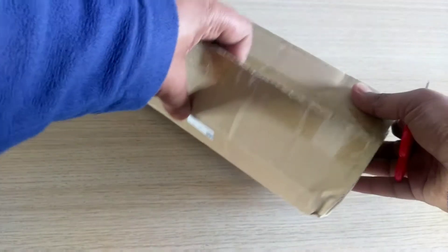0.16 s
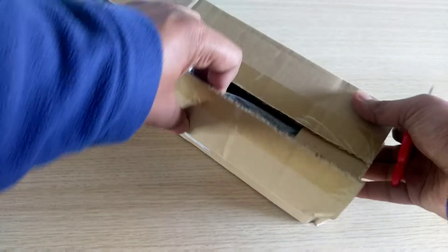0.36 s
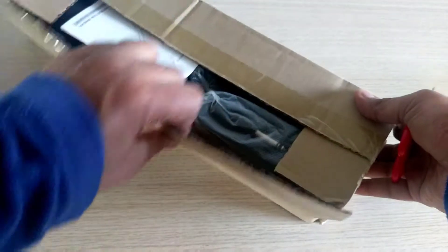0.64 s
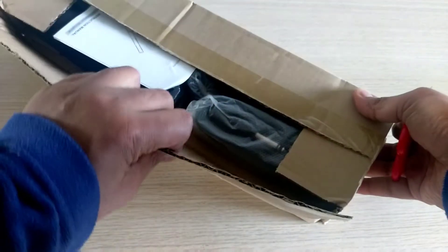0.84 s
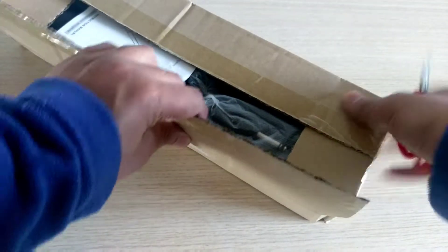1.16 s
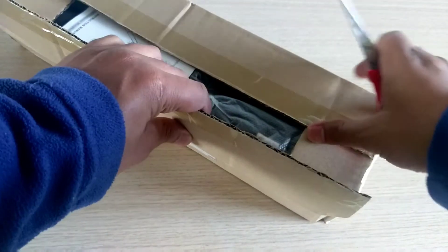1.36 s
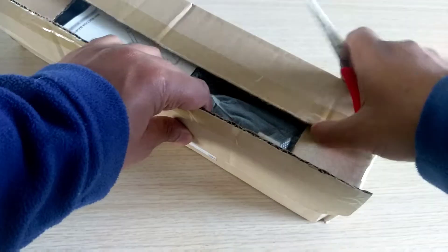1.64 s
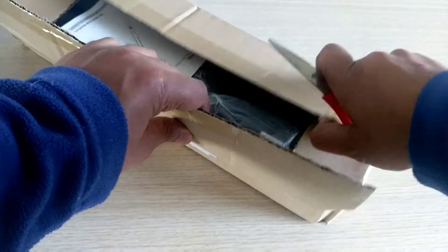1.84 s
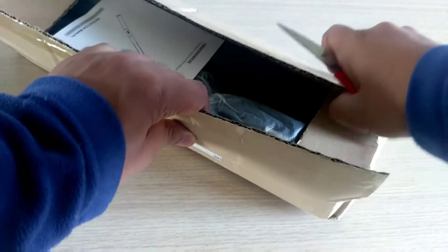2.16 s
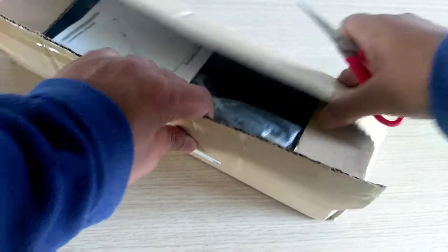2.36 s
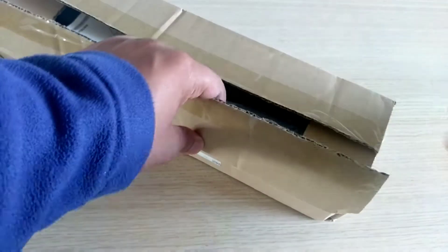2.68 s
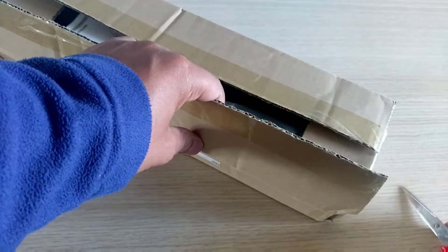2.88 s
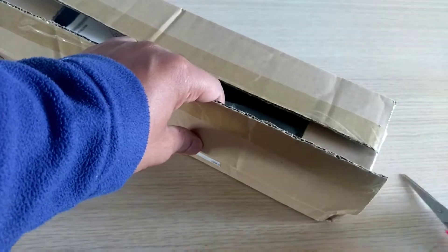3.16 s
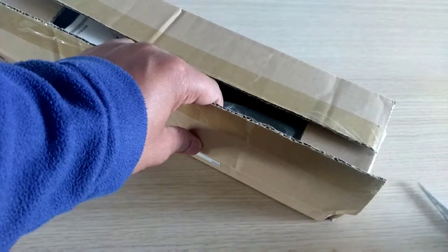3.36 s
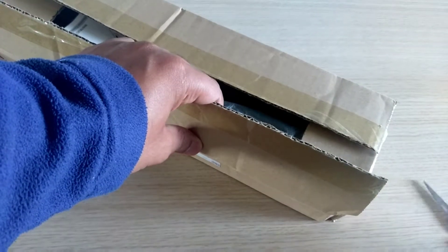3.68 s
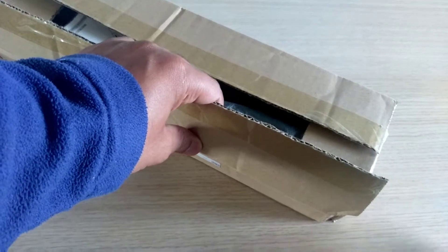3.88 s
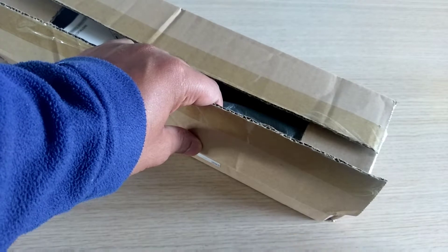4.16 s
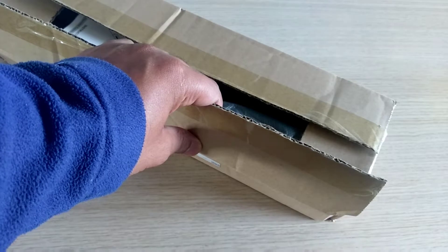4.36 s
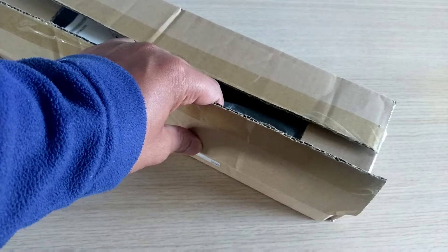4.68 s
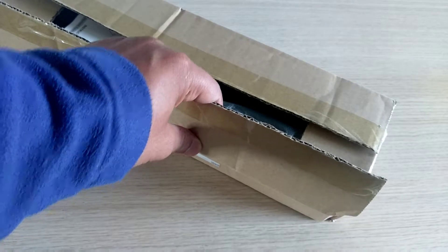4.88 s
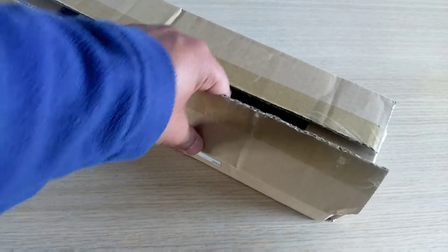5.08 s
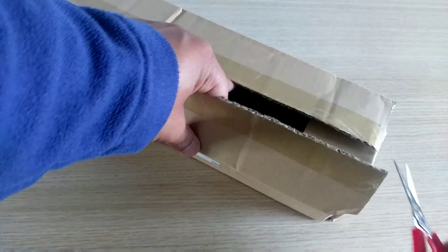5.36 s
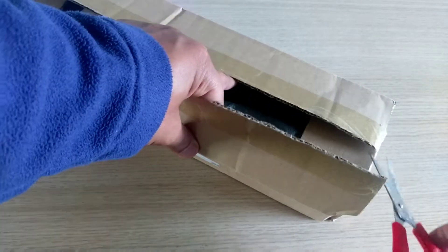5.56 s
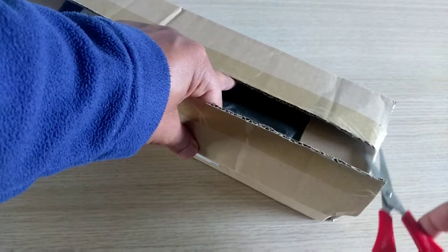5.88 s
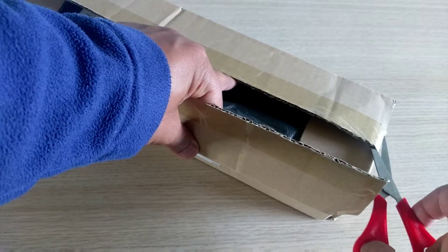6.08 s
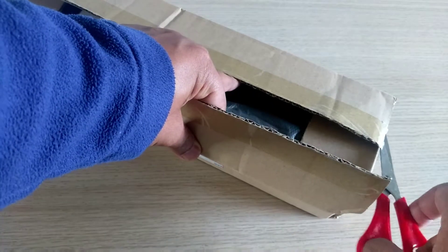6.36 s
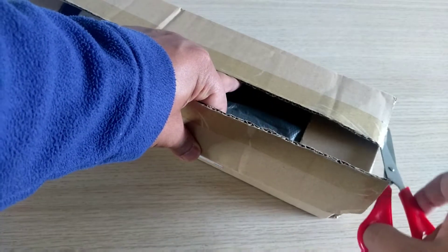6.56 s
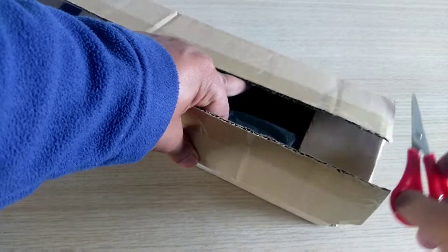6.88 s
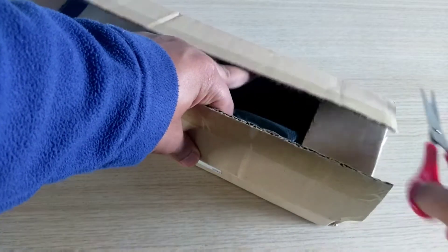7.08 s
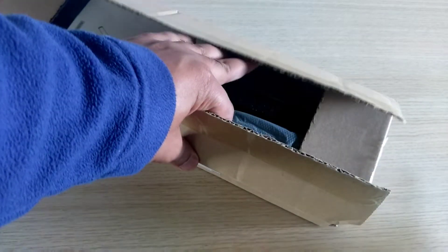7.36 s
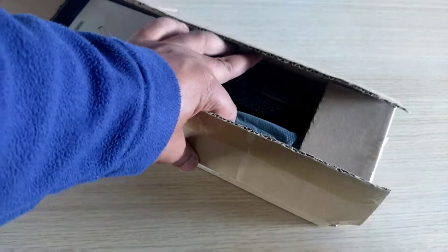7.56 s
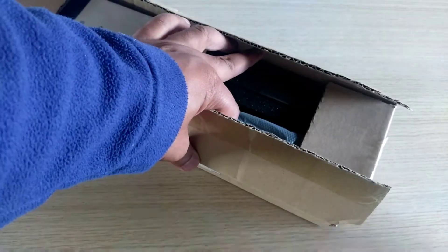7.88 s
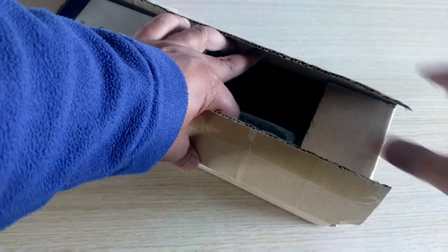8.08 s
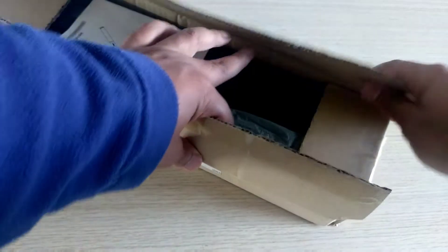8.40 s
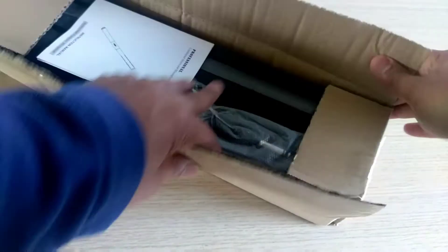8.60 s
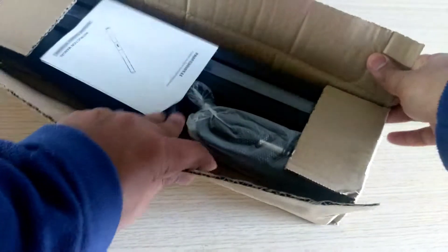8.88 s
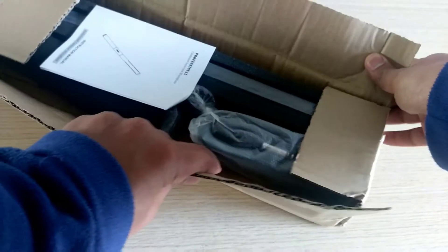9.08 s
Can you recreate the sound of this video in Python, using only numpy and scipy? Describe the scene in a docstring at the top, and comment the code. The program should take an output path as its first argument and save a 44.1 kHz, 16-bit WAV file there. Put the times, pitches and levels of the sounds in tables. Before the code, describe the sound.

Close to the microphones in a small, bare, quiet room: a heavy boxy double bump opens, far louder than everything else. Then card rustles, tape snaps lightly and flaps knock. Midway, scissors clatter in separate hard taps and short slides on wood; later come small steel snips, a crackly flap fold, a few more sharp knocks and light final rustling.

```python
"""Small bare room, wooden table, a camera with two microphones close by: a taped cardboard box is opened.
The box lands with a double thump, flaps knock, hands rub the card, loose tape crinkles; scissors knock, slide and snip.
Blows are bursts of micro-impacts through the modes of the struck body; rubbing and sliding are dense uneven slips.
The direct sound carries echoes from both sides of the room over faint still air.
The two microphone channels oppose each other in the bass."""
import sys
import numpy as np
from scipy import signal
from scipy.fft import rfft, irfft, next_fast_len
from scipy.io import wavfile
from scipy.ndimage import uniform_filter1d

SR = 44100
rng = np.random.default_rng(int(sys.argv[2]) if len(sys.argv) > 2 else 0)


def to_wav(s):
    """Save 16-bit WAV."""
    ch = np.atleast_2d(s).T  # columns
    pcm = np.round(np.clip(ch, -1, 1) * 32767)  # PCM
    wavfile.write(sys.argv[1], SR, pcm.astype(np.int16))


N = 407043
TIME = np.arange(N) / SR  # t/s
SHORT = 4096  # samples in one blow
LEAD_S = .008  # time kept ahead of each blow
TOP_HZ = 13300  # band limit of the camera

# still air: columns [f/Hz, level/dB]
AIR_COLOUR = [(24, 6), (40, 1.5), (1100, -11), (1780, -16.5), (4400, -19.5), (12000, -28.5), (15600, -61.5),
              (22000, -120)]
# room decay: columns [f/Hz, time to fall 60 dB/s]
ROOM_T60 = [(90, 0.67), (210, 0.39), (560, 0.41), (1470, 0.48), (3880, 0.42), (10200, 0.39)]
# colour of the echoes: columns [f/Hz, level/dB]
ROOM_COLOUR = [(100, -3), (220, -0.5), (500, 3.5), (1200, 1.5), (3500, -0.5), (7000, -1.5), (13000, -8)]
# left-right likeness of close sound, then of echoes and air: columns [f/Hz, likeness from -1 to 1]
NEAR_LIKENESS = [(150, -0.95), (450, -0.8), (1300, -0.64), (3000, -0.21), (6000, -0.088), (12000, -0.1)]
DIFFUSE_LIKENESS = [(150, -0.6), (450, -0.64), (1400, 0.0028)]
# left microphone over right: columns [f/Hz, level/dB]
LEFT_LEAD = [(100, -3), (300, -4), (2000, -2), (5000, -4.5), (12000, -2.5)]

# hands moving on the box: columns [middle t/s, half length/s, card rubbing level/dB, tape and sleeve level/dB]
MOVES = [(.004, 0.022, -45.5, -50.5), (0.198, 0.01, -49.5, -90), (0.242, 0.32, -51.5, -62),
         (1.193, 0.1, -62, -62), (1.67, 0.14, -58.5, -61), (2.175, 0.1, -59, -72),
         (2.505, 0.034, -51.5, -60), (2.606, 0.26, -66, -66), (2.933, 0.042, -53, -54.5),
         (3.093, 0.009, -52.5, -49.5), (5.712, 0.03, -60, -67), (6.037, 0.11, -64.5, -65),
         (6.768, 0.033, -51, -61.5), (7.107, 0.11, -55.5, -72), (7.304, 0.035, -50.5, -59.5),
         (7.612, 0.023, -58, -51.5), (7.738, 0.14, -62, -99), (8.84, 0.11, -62, -66.5)]
MOVE_FLATNESS = 1.75  # 2 is a bell; more holds the pressure longer
# a flap edge scraping along the box: columns [middle t/s, half length/s, level/dB]
EDGE_SCRAPES = [(2.186, 0.014, -51), (2.234, 0.0076, -57)]
# loose tape buckling with a distinct snap: columns [t/s, level/dB, centre f/Hz]
CRINKLES = [(0.267, -55.5, 4500), (0.354, -40.5, 6900), (1.1168, -52.5, 5200), (1.272, -51, 5660),
            (1.3599, -53, 5050), (1.6144, -54, 5560), (1.639, -62, 7400), (1.6556, -49.5, 3800),
            (1.706, -49, 2800), (1.7094, -48.5, 5160), (1.7688, -50.5, 6800), (2.0703, -59, 5000),
            (2.1698, -59, 4270), (2.224, -47.5, 6100), (2.2529, -48, 4180), (2.3622, -44, 5200),
            (2.539, -57, 5530), (2.621, -55, 3830), (2.673, -56, 6500), (2.7019, -48.5, 2620),
            (2.8737, -47.5, 4530), (2.982, -50, 5200), (5.5995, -62.5, 5000), (5.699, -61, 5030),
            (5.9662, -57.5, 4230), (6.7382, -51, 5000), (7.258, -54.5, 5760), (7.2956, -40, 4810),
            (7.552, -56.5, 3300), (7.621, -53, 4580), (7.779, -56, 4420), (8.875, -61.5, 4140),
            (8.899, -55, 5000), (9.1966, -53, 5100)]
# lesser snaps come by chance, at a level relative to the rustle
TICKS_PER_S, TICK_DB, TICK_SPREAD_DB = 34, -1.5, 5.5
TICK_HZ, TICK_SPREAD_OCTAVES = 4200, 0.93

# scissors sliding over the table: columns [middle t/s, half length/s, level/dB]
SLIDES = [(3.775, 0.018, -51), (3.87, 0.015, -56.5), (4.17, 0.014, -51.5), (4.355, 0.028, -56.5),
          (4.428, 0.0098, -45.5), (4.88, 0.032, -58), (4.93, 0.17, -60.5)]
# steel scraping as the scissors are lifted: columns [middle t/s, half length/s, level/dB]
LIFTS = [(5.28, 0.013, -43)]
# steel scraping as they are shifted or pushed aside: columns [middle t/s, half length/s, level/dB]
PUSHES = [(3.62, 0.12, -66), (8.119, 0.042, -46)]
# a faint tone after the last knock: columns [middle t/s, half length/s, level/dB]
LINGERING = [(8.48, 0.052, -56)]
# scissors knocking on the table: columns [t/s, body level/dB, crack level/dB]
KNOCKS = [(3.4055, -37, -28.5), (3.4115, -37.5, -35.5), (3.9019, -52, -48), (3.9118, -41.5, -33.5),
          (3.9155, -46, -29), (3.9635, -43.5, -40.5), (4.3671, -44, -39), (4.4422, -55, -38.5),
          (4.4495, -39.5, -38.5), (4.4645, -51, -57), (4.6472, -51, -62.5), (5.1785, -47.5, -44.5),
          (7.9118, -39.5, -39.5), (7.9781, -47, -38.5), (8.2362, -44.5, -53), (8.2477, -43.5, -25),
          (8.2542, -35.5, -27.5)]
# blades biting through tape: columns [t/s, crack level/dB]
SNIPS = [(6.3356, -59.5), (6.3705, -62), (6.3938, -52), (6.4, -60), (6.4114, -46.5), (6.415, -47),
         (6.4731, -37.5)]
SNIP_BODY_DB = -15  # body relative to crack
# flaps folding and knocking: columns [t/s, body level/dB, crack level/dB]
FLAPS = [(1.3803, -54, -47.5), (2.0863, -51, -53.5), (2.1673, -48.5, -53), (2.9532, -49, -44.5),
         (5.4165, -52.5, -49), (6.7453, -52, -48.5), (7.2866, -46, -55), (7.2955, -35.5, -49),
         (7.8013, -48.5, -60.5), (8.7354, -53.5, -56.5)]
# the box lands and bounces once: columns [t/s, body level/dB, crack level/dB, lowest f of the thud/Hz]
SLAMS = [(0.4363, -12.5, -20, 239), (0.4686, -15, -18.5, 50.3)]
THUD_LAG_S = .0012  # the edge cracks first, then the whole bottom of the box lands
# time from first touch to the hardest moment of a contact, in seconds
SLAM_CONTACT_S, FLAP_CONTACT_S, KNOCK_CONTACT_S, SNIP_CONTACT_S = .0027, .0026, .0025, .0008

# resonances of box, flaps, flap edge, table top, table body, lifted steel, pushed scissors and blades:
# columns [f/Hz, width/Hz, level/dB]
BOX_MODES = [(91.7, 20.3, 5), (215, 90, -4), (374, 24, 0.5), (435, 21, 3), (538, 22, 2.5), (880, 220, -9),
             (1390, 400, -8), (2700, 900, -15)]
FLAP_MODES = [(315, 26, -2.5), (560, 8.2, -2.5), (755, 190, -1.5), (1210, 22, -9)]
EDGE_MODES = [(895, 250, 1), (1300, 260, 5), (3650, 900, -10.5), (6500, 620, -15.5)]
TABLE_TOP_MODES = [(956, 60, 6.7), (1106, 52, 5.2), (1425, 23, 8.3), (1958, 64, 6.9), (2125, 31, 2.3),
                   (2590, 76, 4.2), (3000, 320, 6.9)]
TABLE_BOOM_MODES = [(330, 20, 4.5), (463, 28, 5.5), (587, 20, 4.5), (755, 62, 4.5)]
LIFT_MODES = [(2930, 160, -7.5), (4600, 160, -3.5), (6640, 300, -3), (10100, 510, -13.5)]
PUSH_MODES = [(1947, 47, 3), (3030, 85, -4.5), (4500, 180, -11.5), (5950, 200, -15)]
BLADE_MODES = [(4750, 900, 1.5), (5360, 1000, -1), (7100, 900, -21)]
# broad colours of card, wood, steel, rubbed card, rustling tape, and the tilt of a slide:
# columns [f/Hz, level/dB]
CARD_COLOUR = [(30, -41.5), (70, -10.5), (150, -5.5), (400, -7), (700, -4.5), (1400, -16), (2100, -26),
               (3000, -15.5), (6000, -21), (9000, -27), (13000, -32)]
WOOD_COLOUR = [(30, -50), (100, 9.5), (200, -7.5), (500, -6.5), (1200, 1), (3000, 2.5), (5000, -1.5),
               (8000, -8.5), (10500, -8), (13000, -31.5)]
STEEL_COLOUR = [(100, -41), (700, -14.5), (2000, -16), (4500, -28), (7000, -6.5), (13000, -32)]
RUB_COLOUR = [(40, -30), (100, -4), (180, -10.5), (350, 0), (800, -1), (1300, -8.5), (1900, -25.5),
              (5000, -24), (13000, -47)]
RUSTLE_COLOUR = [(400, -18.5), (1200, -1), (3000, 1.5), (5500, -6), (8000, -5.5), (13000, -23)]
SLIDE_TILT = [(80, -18), (500, -5.5), (900, 2.5), (2000, 3), (3200, -2.5), (5000, -3.5), (10000, -1)]


def amp(db):
    """Decibels to gain."""
    return 10 ** (np.asarray(db) / 20)


def unit(x):
    """x at rms 1."""
    return x / np.sqrt(np.mean(x ** 2) + 1e-20)


def along(points, hz):
    """(f/Hz, value) points read on a log frequency axis."""
    f, value = np.transpose(points)
    return np.interp(np.log(hz + 1), np.log(f + 1), value)


def wobble(rate):
    """A random curve of straight pieces, rate knots a second."""
    knots = rng.standard_normal(int(N * rate / SR) + 2)
    return np.interp(TIME * rate, np.arange(len(knots)), knots)


def filtered(x, response):
    """x through a response given as a function of f/Hz."""
    size = next_fast_len(x.shape[-1] + SHORT, True)
    spectrum = rfft(x, size) * response(np.fft.rfftfreq(size, 1 / SR))
    return irfft(spectrum, size)[..., :x.shape[-1]]


def body(hz, colour, modes, broad_db=0):
    """Gain of a body: resonances standing on a broad colour, summed as power."""
    power = amp(along(colour, hz) + broad_db) ** 2
    for centre, width, db in modes:
        damping = (hz * width) ** 2
        power = power + amp(db) ** 2 * damping / ((centre ** 2 - hz ** 2) ** 2 + damping)
    return np.sqrt(power)


def causal(gain):
    """The minimum-phase response with this gain, which rings only after the blow."""
    cepstrum = irfft(np.log(np.maximum(gain, 1e-6)))
    half = len(cepstrum) // 2
    return np.exp(rfft(np.r_[cepstrum[0], 2 * cepstrum[1:half], np.zeros(half)]))


def stereo(pair, likeness, gain=lambda hz: 1):
    """Two unrelated signals, coloured by a gain and mixed into left and right of the given likeness."""
    def mid_side(hz):
        turn = np.arccos(np.clip(along(likeness, hz), -.99, .99)) / 2
        return gain(hz) * np.array([np.cos(turn), np.sin(turn)])
    mid, side = filtered(pair, mid_side)
    return np.array([mid + side, mid - side])


def add(track, s, sound):
    """Mix a sound into the track at time s."""
    part = track[:, max(round(s * SR), 0):][:, :sound.shape[1]]
    part += sound[:, :part.shape[1]]


def swells(rows, flatness=2):
    """Gain of strokes that swell, hold and fade."""
    t = TIME[::64]  # coarse steps suffice for so slow a curve
    gain = sum(amp(db) * np.exp(-np.abs((t - s) / half) ** flatness / 2) for s, half, db in rows)
    return np.interp(TIME, t, gain)


def friction(response, grain_db, grain_rate, drift_db=2.7, ripple_db=3.5, ripple_hz=110):
    """Dense slips of uneven strength through a body, at rms 1; its many lesser modes ripple the colour."""
    strength_db = grain_db * wobble(grain_rate) + drift_db * wobble(35)
    slips = rng.standard_normal((2, N)) * amp(strength_db)
    grid = np.fft.rfftfreq(SHORT, 1 / SR)
    ripple = np.interp(grid / ripple_hz, np.arange(SHORT), rng.standard_normal(SHORT))
    gain = response(grid) * amp(ripple_db * ripple * grid / (grid + 700))  # ripple grows with frequency
    return unit(stereo(slips, NEAR_LIKENESS, lambda hz: np.interp(hz, grid, gain)))


def wavering(x, depth=.009, rate=28):
    """The pitch of a scrape wanders as the grip and pressure change."""
    warped = TIME + np.cumsum(depth * wobble(rate)) / SR
    return np.array([np.interp(warped % TIME[-1], TIME, channel) for channel in x])


def evened(burst, share=0.23):
    """The burst with chance spectral peaks and hollows partly levelled, so the struck body gives the colour."""
    spectrum = rfft(burst)
    power = np.abs(uniform_filter1d(np.abs(spectrum) ** 2, size=24, axis=-1)) + 1e-12
    return irfft(spectrum / power ** (share / 2))


def contact(length, grit, impact_db, swell=1.28, give_db=-20, give_s=0.0013, crush_db=-21,
            crush_s=0.0087, mirror=0.81, mirror_s=0.0008914, mirror_hz=2500):
    """Spectrum of a contact: micro-impacts swell around a clean impact and settle; a near surface mirrors treble."""
    t = np.arange(SHORT) / SR - LEAD_S
    u = np.maximum(t, 0) / max(length, 1e-4)
    give = amp(give_db) * np.exp(-np.abs(t) / give_s)
    settle = amp(crush_db) * (1 - np.exp(-u)) * np.exp(-np.abs(t) / crush_s)
    envelope = give + (u * np.exp(1 - u)) ** swell + settle
    unevenness = np.exp(grit * rng.standard_normal(SHORT))
    burst = rng.standard_normal((2, SHORT)) * unevenness * envelope
    impact = signal.hilbert(np.sinc((t - length) * SR))
    clean = unit(np.array([impact.real, impact.imag]))  # a quarter turn apart in phase
    force = unit(evened(burst)) + amp(impact_db) * clean
    lag = mirror_s * (.5 + rng.random())
    hz = np.fft.rfftfreq(SHORT, 1 / SR)
    echo = mirror * hz ** 2 / (hz ** 2 + mirror_hz ** 2) * np.exp(-2j * np.pi * hz * lag)
    return rfft(stereo(force, NEAR_LIKENESS)) * (1 + echo)


def at_level(spectrum, db):
    """The short sound with this spectrum, at rms level db over the 13 ms after the blow."""
    x = irfft(spectrum)
    after = x[:, round(LEAD_S * SR):][:, :570]
    return x * amp(db) / np.sqrt(np.mean(after ** 2) + 1e-20)


def blows(rows, length, colour, modes, split_hz, grit, body_lag=0, mode_scatter=.008):
    """Each contact pushes a body's low modes and cracks its high ones; every spot and grip shifts the modes."""
    out, hz = np.zeros((2, N)), np.fft.rfftfreq(SHORT, 1 / SR)
    high = (hz / split_hz) ** 6
    for s, body_db, crack_db in rows:
        spot = []
        for centre, width, db in modes:
            shifted = centre * np.exp(mode_scatter * rng.standard_normal())
            spot.append((shifted, width, db + 2 * rng.standard_normal()))
        low_gain = body(hz, colour, spot) / np.sqrt(1 + high)
        high_gain = low_gain * np.sqrt(high)
        push = contact(length, grit, impact_db=2.5)
        crack = contact(length, grit, impact_db=-13.5)
        add(out, s + body_lag - LEAD_S, at_level(push * causal(low_gain), body_db))
        add(out, s - LEAD_S, at_level(crack * causal(high_gain), crack_db))
    return out


def still_air():
    """Steady coloured noise, spread between the microphones, at rms 1."""
    noise = rng.standard_normal((2, N))
    return unit(stereo(noise, DIFFUSE_LIKENESS, lambda hz: amp(along(AIR_COLOUR, hz))))


def room(x, delay=0.0014, build=0.003, boom_hz=95, boom_db=-36, boom_t60=0.67, clump_db=1.5):
    """Each side meets its own walls, whose echoes decay in clumps; one low standing wave lingers longest."""
    hz, t, z = signal.stft(rng.standard_normal((2, 2, SR)), SR, nperseg=512)
    fall = np.log(1000)  # 60 dB
    decay = np.exp(-fall * t / along(ROOM_T60, hz)[:, None])
    colour = amp(along(ROOM_COLOUR, hz)[:, None])
    tails = signal.istft(z * colour * decay, SR, nperseg=512)[1]
    age = np.arange(tails.shape[-1]) / SR
    onset = 1 - np.exp(-np.maximum(age - delay, 0) / build)
    tails = np.array([stereo(tail, DIFFUSE_LIKENESS) for tail in tails]) * onset
    tails = tails * amp(clump_db * wobble(170)[:len(age)])
    tails = tails / np.linalg.norm(tails[:, 0])
    boom = amp(boom_db) * np.sin(2 * np.pi * boom_hz * age) * np.exp(-fall * age / boom_t60) / 2
    tails[0] += np.array([boom, -.6 * boom])  # the left send drives it, opposed in the two channels
    return sum(signal.oaconvolve(side[None], tail, axes=1)[:, :N] for side, tail in zip(x, tails))


def hand_effort():
    """How hard the moving hands rub the card, and how much they stir the tape."""
    rub = swells([(s, half, db) for s, half, db, _ in MOVES], MOVE_FLATNESS)
    rustle = swells([(s, half, db) for s, half, _, db in MOVES], MOVE_FLATNESS)
    return rub, rustle


def hands(rub, rustle):
    """Fingers rub the hollow box and its fibres crackle; a flap edge scrapes; tape and sleeve rustle above it."""
    card = friction(lambda hz: body(hz, RUB_COLOUR, FLAP_MODES, broad_db=4.5), grain_db=3.0, grain_rate=130)
    fibres = friction(lambda hz: body(hz, RUSTLE_COLOUR, EDGE_MODES, broad_db=-12),
                      grain_db=5.5, grain_rate=420)
    tape = friction(lambda hz: amp(along(RUSTLE_COLOUR, hz)), grain_db=3.0, grain_rate=1700)
    rubbing = rub * (card + amp(-9) * fibres)
    return rubbing + swells(EDGE_SCRAPES) * fibres + rustle * tape


def crinkles(rustle, length=0.0009, octaves=0.64, skirt_db=-21):
    """Patches of tape buckle, each at its own pitch: distinct snaps, and chance ones that follow the rustle."""
    out, hz = np.zeros((2, N)), np.fft.rfftfreq(SHORT, 1 / SR)
    ticks = []
    for when, size, pitch in rng.random((int(TICKS_PER_S * N / SR), 3)):
        rustle_db = 20 * np.log10(rustle[int(when * N)] + 1e-9)
        db = rustle_db + TICK_DB + TICK_SPREAD_DB * (2 * size - 1)
        centre_hz = TICK_HZ * 2 ** (TICK_SPREAD_OCTAVES * (2 * pitch - 1))
        ticks.append((when * N / SR, db, centre_hz))
    for s, db, centre_hz in list(CRINKLES) + ticks:
        bell = np.exp(-(np.log2((hz + 1) / centre_hz) / octaves) ** 2 / 2)
        patch = bell + amp(skirt_db) * hz / (hz + 300)
        add(out, s - LEAD_S, at_level(contact(length, grit=0.82, impact_db=-8) * causal(patch), db))
    return out


def scrapes():
    """Slips sound the table top, the lifted steel and the pushed scissors; a faint tone follows the last knock."""
    def table_gain(hz):
        table_modes = TABLE_TOP_MODES + TABLE_BOOM_MODES
        return body(hz, WOOD_COLOUR, table_modes, broad_db=-3.0) * amp(along(SLIDE_TILT, hz))
    table = friction(table_gain, grain_db=4, grain_rate=340)
    lift = friction(lambda hz: body(hz, STEEL_COLOUR, LIFT_MODES, broad_db=-1.5), grain_db=4.0, grain_rate=600)
    push = friction(lambda hz: body(hz, WOOD_COLOUR, PUSH_MODES, broad_db=-20.0), grain_db=0.5, grain_rate=180)
    tone = friction(lambda hz: body(hz, WOOD_COLOUR, [(1148, 34, 0)], broad_db=-18.0),
                    grain_db=11.5, grain_rate=280)
    sliding = swells(SLIDES) * wavering(table)
    pushing = swells(PUSHES) * wavering(push)
    return sliding + swells(LIFTS) * lift + pushing + swells(LINGERING) * tone


def scissor_knocks():
    """The scissors hit the table, often one half just after the other, and ring its modes."""
    table_modes = TABLE_TOP_MODES + TABLE_BOOM_MODES
    return blows(KNOCKS, KNOCK_CONTACT_S, WOOD_COLOUR, table_modes, split_hz=1170, grit=0.66)


def scissor_snips():
    """The closing blades break through the tape in short bites that ring the steel."""
    rows = [(s, db + SNIP_BODY_DB, db) for s, db in SNIPS]
    return blows(rows, SNIP_CONTACT_S, STEEL_COLOUR, BLADE_MODES, split_hz=1270, grit=0.4)


def flap_knocks():
    """Flaps give at their folds and knock against the box."""
    return blows(FLAPS, FLAP_CONTACT_S, CARD_COLOUR, FLAP_MODES, split_hz=1560, grit=0.74)


def box_slams():
    """The box cracks on its edge and thuds onto its bottom; the flatter it lands, the deeper the thud."""
    out = np.zeros((2, N))
    for s, body_db, crack_db, lowest_hz in SLAMS:
        slam = blows([(s, body_db, crack_db)], SLAM_CONTACT_S, CARD_COLOUR, BOX_MODES,
                     split_hz=880, grit=0.36, body_lag=THUD_LAG_S)
        out += signal.sosfilt(signal.butter(2, lowest_hz, "high", fs=SR, output="sos"), slam)
    return out


def scene():
    """Box, tape and scissors in the room, over still air; the right channel hears more."""
    rub, rustle = hand_effort()
    rubbing, tape = hands(rub, rustle), crinkles(rustle)
    scraping, knocks, snips = scrapes(), scissor_knocks(), scissor_snips()
    flaps, slams = flap_knocks(), box_slams()
    near = rubbing + tape + scraping + knocks + snips + flaps + slams
    # each source reaches the walls at its own level
    send = amp(-10.5) * rubbing + amp(-7.5) * tape + amp(-4) * scraping
    send = send + amp(-5.5) * knocks + amp(-9.0) * snips
    send = send + amp(-5.5) * flaps + amp(-11) * slams
    mix = near + amp(-0.1) * room(send) + amp(-63) * still_air()
    halves = np.array([[1], [-1]]) / 2  # half the lead to the left, half against the right
    return filtered(mix, lambda hz: amp(along(LEFT_LEAD, hz) * halves))


def record(dry, bass_hz=60):
    """The camera thins the deep bass, rounds the highest peaks and cuts steeply above its band limit."""
    x = filtered(dry, lambda hz: 1j * hz / (1j * hz + bass_hz))
    x = x / (1 + np.abs(x / .85) ** 6) ** (1 / 6)
    return filtered(x, lambda hz: 1 / np.sqrt(1 + (hz / TOP_HZ) ** 80))


dry = scene()
out = record(dry)
to_wav(out)
```